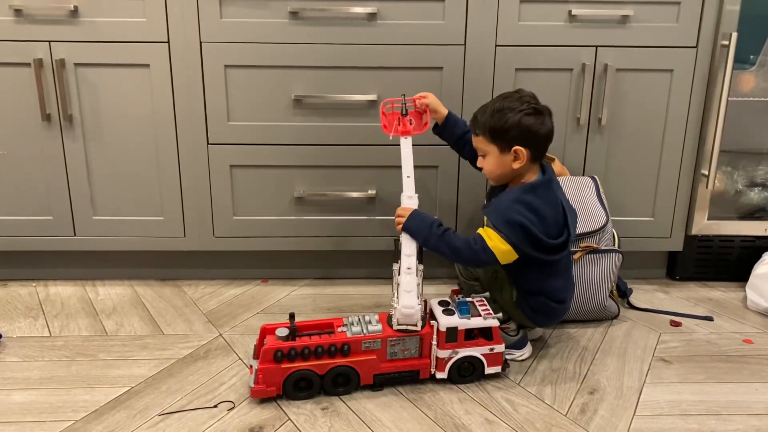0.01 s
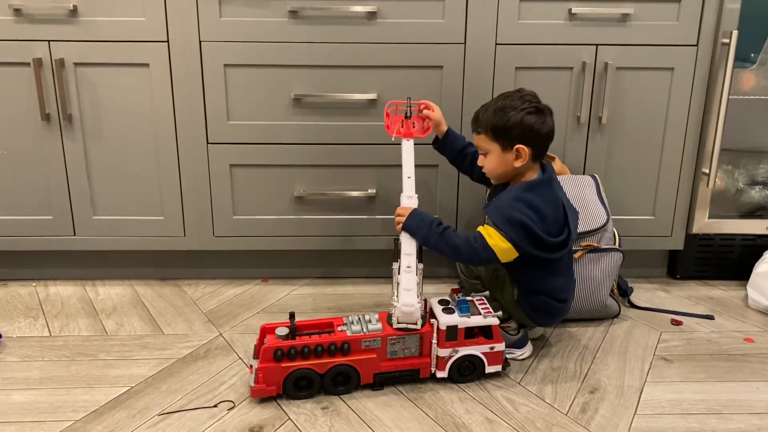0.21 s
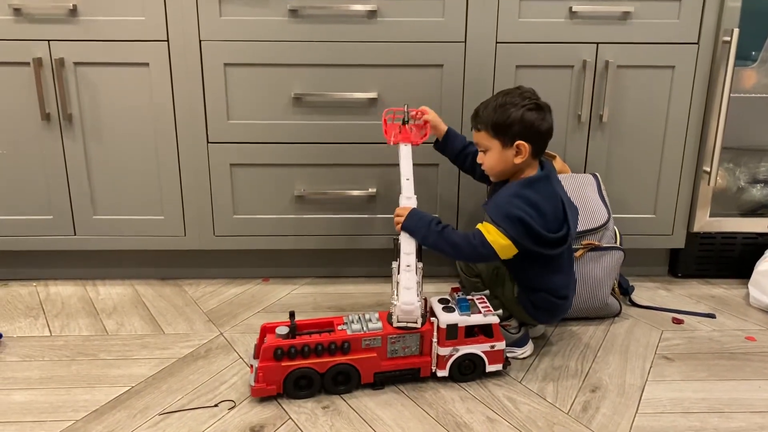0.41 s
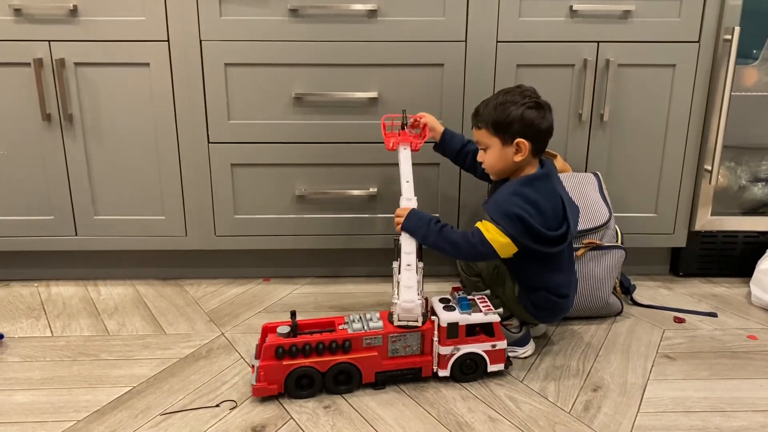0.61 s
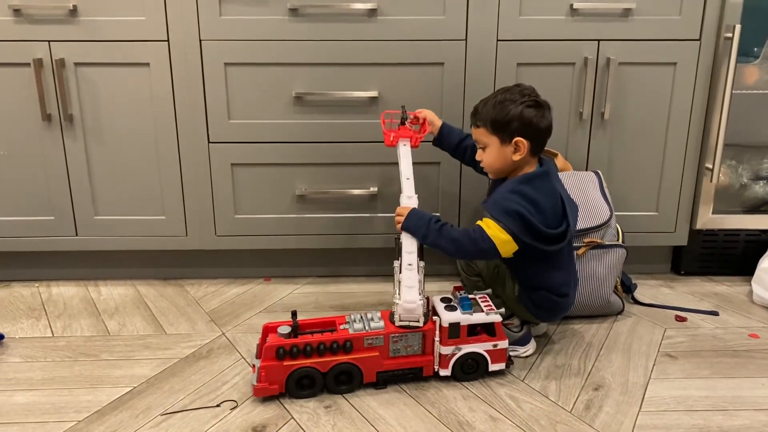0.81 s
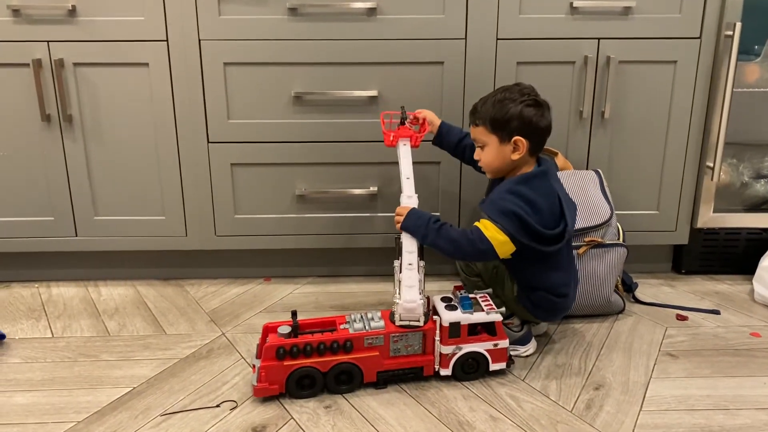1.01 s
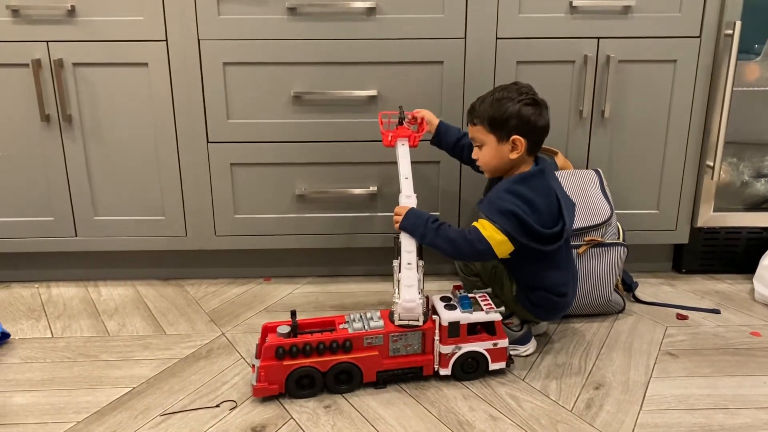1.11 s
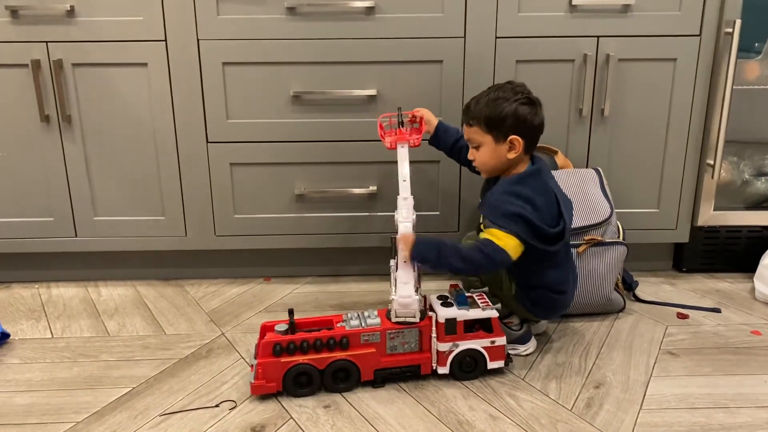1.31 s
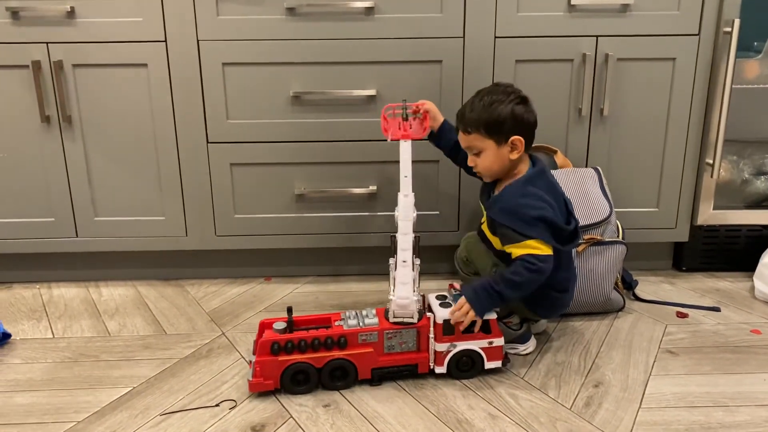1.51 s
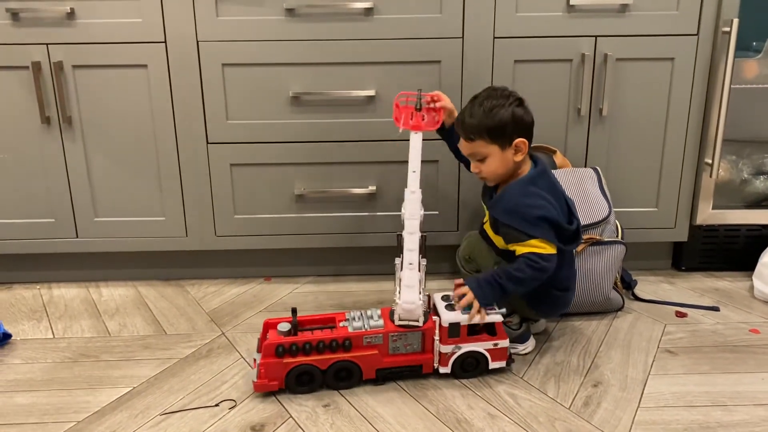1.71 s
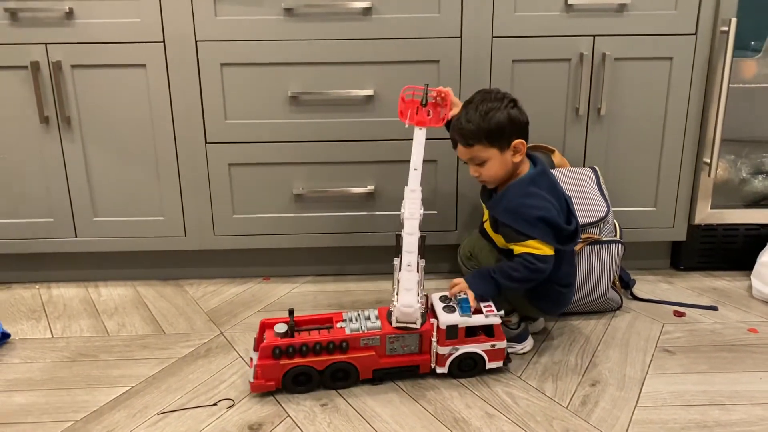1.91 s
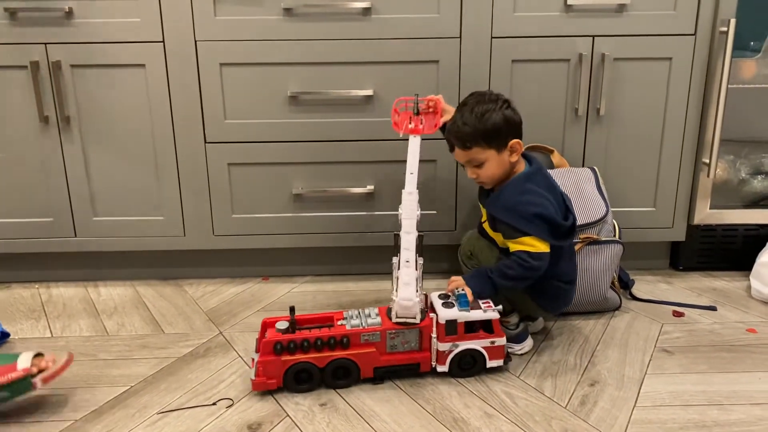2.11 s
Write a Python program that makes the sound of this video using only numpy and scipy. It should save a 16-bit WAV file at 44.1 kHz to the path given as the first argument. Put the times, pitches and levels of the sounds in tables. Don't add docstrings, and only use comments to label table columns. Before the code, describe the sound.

Hollow plastic toy ladder clicks and rattles in a dense irregular burst, strongest near the middle, with soft knocks and thuds; then sparse ticks and faint cloth rustle, heard a few steps away in a hard kitchen.

```python
import sys
import numpy as np
from scipy import signal
from scipy.fft import rfft, irfft, next_fast_len
from scipy.io import wavfile
from scipy.ndimage import uniform_filter1d

SR = 44100
rng = np.random.default_rng(int(sys.argv[2]) if len(sys.argv) > 2 else 0)


def ratio_of_db(decibels):
    return 10 ** (np.asarray(decibels, float) / 20)


def bounce(signal):
    frames = np.transpose(np.atleast_2d(signal))
    limited = np.clip(frames, -1, 1)
    pcm = np.round(limited * 32767).astype(np.int16)
    wavfile.write(sys.argv[1], SR, pcm)


N = 97020

# (time [s], rattle level [dB])
SHAKE = [(.215, -59), (.24, -38), (.33, -45), (.43, -46), (.47, -47.5), (.57, -49.5), (.61, -52),
         (.72, -59.5), (.76, -41), (.8, -98), (.83, -46), (.875, -46.5), (.915, -30.5), (1.03, -45.5),
         (1.1, -52.5), (1.22, -66), (1.27, -51), (1.4, -62)]
# (frequency [Hz], density [dB per Hz])
RATTLE_SPECTRUM = [(150, -36), (300, -2), (1000, -7), (2500, -6.5), (6500, -10.5), (9000, -14),
                   (13000, -16), (17000, -23)]
# (frequency [Hz], level [dB])
LADDER_MODES = [(1000, -37), (1250, -4), (2120, -3.5), (2500, -7), (2800, -4), (5700, -5)]
# (time [s], peak [dB], ring [Hz], treble tick [dB])
CLICKS = [(.2245, -55, 6000, -27), (.2330, -33.5, 7100, -7.5), (.2368, -20.5, 4600, -24),
          (.2398, -19, 1230, -23), (.2612, -31.5, 2500, -8), (.2946, -24.5, 4300, -19),
          (.3408, -23, 3220, -19), (.372, -23, 2660, -30), (.4498, -25.5, 5730, -17.5),
          (.4565, -39, 6770, -25), (.4642, -26.5, 6000, -19), (.471, -27, 6060, -30),
          (.4812, -28, 5660, -14), (.489, -26, 4100, -28), (.4965, -44, 5900, -35),
          (.508, -40.5, 5000, -11), (.5303, -31.5, 4530, -14), (.546, -25, 2550, -24),
          (.6266, -37.5, 6850, -12), (.632, -27.5, 5400, -19), (.6612, -31.5, 2270, -25),
          (.733, -38, 3060, -35), (.7418, -28.5, 1960, -29), (.7515, -31, 3880, -22),
          (.759, -29.5, 3070, -32), (.8142, -23.5, 2200, -22), (.818, -29, 4550, -22),
          (.88, -23, 2750, -29), (.8918, -33, 3060, -19), (.9018, -20, 2420, -15.5),
          (.9108, -19, 2190, -33), (.9158, -14, 5200, -24), (.931, -40, 2460, -29), (.94, -23, 1240, -26),
          (.9775, -29.5, 2600, -16), (1.016, -21.5, 5930, -27), (1.0205, -20, 5440, -36),
          (1.0853, -26, 2600, -26), (1.149, -35, 2200, -26), (1.2452, -30.5, 7150, -18),
          (1.2498, -28.5, 6120, -35), (1.252, -25, 3200, -27), (1.259, -31, 4870, -23),
          (1.4428, -33, 4220, -24.5), (1.797, -49, 2600, -34), (1.811, -36.5, 4400, -21),
          (1.835, -60, 3000, -23), (1.9, -39.5, 3800, -28), (1.9672, -37, 2880, -22),
          (2.1268, -39.5, 6570, -16.5)]
# (frequency [Hz], density [dB per Hz])
TICK_SPECTRUM = [(3000, -9.5), (8000, 0), (11000, 2), (13500, -1.5), (16000, -4.5)]
# (time [s], peak [dB], ring [Hz], upper modes [dB])
KNOCKS = [(0.243, -38, 388, -32), (0.29, -46, 403, -16), (0.359, -40, 398, -28), (0.399, -46, 396, -28),
          (0.419, -54.5, 332, 4), (0.491, -43.5, 390, -9), (0.551, -43, 278, -6), (0.565, -46, 306, -9),
          (0.822, -44, 422, -7.5), (0.945, -35, 419, -11), (1.001, -34, 294, -11), (1.256, -40.5, 361, -30),
          (1.272, -38, 380, -18.5), (1.306, -37.5, 417, -23), (1.321, -32, 376, -21),
          (1.335, -37.5, 339, -13), (1.356, -34, 351, -38), (1.374, -58, 353, -16),
          (1.45, -38.5, 390, -18.5), (1.478, -45, 305, -11.5), (1.512, -51.5, 368, -13),
          (2.131, -43, 385, -47)]
# (multiple of the knock [ratio], level [dB])
UPPER_MODES = [(1.56, 15.5), (2.8, 13), (3.4, -2)]
# (time [s], peak [dB], frequency [Hz])
THUDS = [
    (0.256, -47.5, 111),
    (0.558, -46, 151),
    (0.748, -64, 118),
    (0.925, -35, 170),
    (1.079, -38, 74),
    (1.109, -63, 65),
    (1.451, -49, 120),
    (2.163, -43, 68.4),
    (2.18, -50, 52),
]
# (time [s], level [dB], centre [Hz], width [Hz], decay T60 [s])
SHIVERS = [
    (.239, -38.5, 1370, 257, 0.067),
    (.45, -41.5, 5800, 604, 0.15),
    (.905, -38.5, 1140, 495, 0.2),
    (1.016, -49, 4900, 1520, 0.058),
    (1.2475, -39, 4910, 3500, 0.13),
    (1.3, -45.5, 560, 305, 0.14),
    (1.444, -45, 1030, 810, 0.063),
]
# (time [s], level [dB])
CLOTH_MOVES = [(.17, -71), (.22, -64), (.3, -74), (1.4, -62.5), (1.57, -60.5), (1.63, -57.5), (1.74, -56.5),
               (1.8, -50.5), (1.87, -59), (1.96, -53.5), (2.05, -54), (2.12, -55), (2.2, -55)]
# (frequency [Hz], density [dB per Hz])
FABRIC_SPECTRUM = [(150, -32.5), (300, -2), (1500, -12), (4500, -11), (7000, -13), (10000, -15.5),
                   (17000, -21.5)]
# (frequency [Hz], density [dB per Hz])
AIR_SPECTRUM = [(15, -70), (50, -8), (110, -7.5), (330, -13.5), (500, -22.5), (2000, -32), (8000, -38),
                (17000, -39.5)]
# (time [s], lift [dB])
RUMBLE_LIFT = [(0, -1), (.2, 1.5), (.3, 9.5), (.6, 5.5), (.75, 3.5), (.95, 12.5), (1.2, 2.5), (1.4, 6.5),
               (1.6, -2), (2.2, 1.5)]
# (frequency [Hz], decay T60 [s])
KITCHEN_T60 = [(200, 0.47), (1500, 0.56), (5000, 0.39), (14000, 0.1)]
# (frequency [Hz], likeness [0 to 1])
PORT_LIKENESS = [(60, .95), (300, .8), (700, .3), (1200, .35), (1900, .1), (2500, .55), (5200, .25)]
# (frequency [Hz], left leads by [rad])
PORT_LEAD = [(60, .05), (400, .45), (1100, 1.5), (1700, 3.2), (2100, 6.1), (2900, 7.0), (4000, 6.2),
             (7016, 6.28)]
# (frequency [Hz], left over right [dB])
PORT_LEAN = [(100, .5), (300, 2.4), (600, 2.8), (1300, -.5), (3000, 1.2), (6000, -.3), (9000, 0)]


def evened(x):
    return x / np.sqrt(np.mean(x ** 2) + 1e-20)


def read(points, hz):
    f, value = np.transpose(points)
    return np.interp(np.log(hz + 1), np.log(f + 1), value)


def curve(points):
    return np.interp(np.arange(N) / SR, *np.transpose(points), left=-120, right=-120)


def add(mix, s, sound):
    part = mix[round(s * SR):][:len(sound)]
    part += sound[:len(part)]


def ring(hz, t60, rise_s=.0004):
    t = np.arange(int(abs(t60) * SR) + 20) / SR
    return (1 - np.exp(-t / rise_s)) * ratio_of_db(-60 * t / t60) * np.sin(2 * np.pi * hz * t)


def colour(x, spectrum):
    log_gain = np.log(ratio_of_db(read(spectrum, np.abs(np.fft.fftfreq(4096, 1 / SR)))))
    taps = np.fft.ifft(np.exp(np.conj(signal.hilbert(log_gain)))).real[:2048]
    return signal.oaconvolve(x, taps)[:N]


def grains(per_s, spread_db):
    hit, size, sign = rng.random((N, 3)).T
    level_db = spread_db * np.minimum(-np.log(size + 1e-9), 5)
    return (hit < per_s / SR) * ratio_of_db(level_db) * np.sign(sign - .5)


def ladder(impacts):
    t60_at_1khz = 0.037
    weights = rng.uniform(-1.5, 1.5, (len(LADDER_MODES), N // 64 + 1)).repeat(64, axis=1)[:, :N]
    out = np.zeros(N)
    for (hz, db), weight in zip(LADDER_MODES, weights):
        mode = ring(hz, t60_at_1khz * (1000 / hz) ** 0.36)
        out += ratio_of_db(db) * signal.oaconvolve(impacts * weight, mode)[:N]
    return out


def rattle():
    impacts = grains(per_s=3000, spread_db=2.2)
    chatter = evened(colour(impacts, RATTLE_SPECTRUM))
    ringing = ratio_of_db(-15.5) * evened(ladder(impacts))
    return ratio_of_db(curve(SHAKE)) * (chatter + ringing)


def clicks():
    ring_t60, tick_t60, lag_s = .007, .008, 0.00074
    rings, blows, cracks, ticks = np.zeros((4, N))
    fade = ratio_of_db(-60 * np.arange(900) / SR / tick_t60)
    for (s, db, hz, tick_db), noise in zip(CLICKS, rng.standard_normal((len(CLICKS), 900))):
        body = ring(hz, ring_t60)
        roughness = 1 + 0.26 * noise[:len(body)].clip(-1.5, 1.5)
        add(rings, s, ratio_of_db(db + 1) * body * roughness)
        add(ticks, s, ratio_of_db(db + tick_db + 17) * noise * fade)
        add(cracks, s, ratio_of_db(db + 11.5) * noise[::-1] * fade ** 0.63)
        add(blows, s, ratio_of_db(np.array([db - 16])))
    thin_cracks = uniform_filter1d(np.diff(cracks, prepend=0), size=4)
    snaps = rings + colour(ticks, TICK_SPECTRUM) + ladder(blows) + colour(thin_cracks, RATTLE_SPECTRUM)
    return np.roll(snaps, round(lag_s * SR))


def knocks():
    t60, rise_s = 0.079, 0.0015
    out = np.zeros(N)
    detunes = rng.uniform(.88, 1.12, (len(KNOCKS), len(UPPER_MODES)))
    for (s, db, hz, upper_db), detune in zip(KNOCKS, detunes):
        add(out, s, ratio_of_db(db + 1.5) * ring(hz, t60, rise_s))
        for (multiple, mode_db), shift in zip(UPPER_MODES, detune):
            mode = ring(hz * multiple * shift, t60 * 0.39, rise_s * 0.47)
            add(out, s, ratio_of_db(db + 1.5 + upper_db + mode_db) * mode)
    for s, db, hz in THUDS:
        add(out, s, ratio_of_db(db + 13) * ring(hz, t60=0.027, rise_s=0.0035))
    return out


def shivers():
    out, t = np.zeros(N), np.arange(SR // 4) / SR
    draws = rng.standard_normal((len(SHIVERS), 2, len(t)))
    for (s, db, hz, width_hz, t60), (hit, size) in zip(SHIVERS, draws):
        edges_hz = [hz - width_hz / 2, hz + width_hz / 2]
        band = signal.butter(2, edges_hz, "bandpass", fs=SR, output="sos")
        buzz = evened(signal.sosfilt(band, (hit > 1) * size))
        add(out, s, ratio_of_db(db - 60 * t / t60) * np.minimum(t / .003, 1) * buzz)
    return out


def cloth():
    friction = colour(grains(per_s=6000, spread_db=2.8), FABRIC_SPECTRUM)
    return ratio_of_db(curve(CLOTH_MOVES)) * evened(friction)


def hush():
    noise = rng.standard_normal((2, N))
    air = ratio_of_db(-57) * evened(np.array([colour(v, AIR_SPECTRUM) for v in noise]))
    bass = signal.sosfilt(signal.butter(2, 220, fs=SR, output="sos"), air)
    return air + (ratio_of_db(curve(RUMBLE_LIFT)) - 1) * bass


def kitchen(x, room_db):
    turn_hz, early_db, size = 14.035, 0, SR // 2
    out = np.zeros((2, N))
    turn = np.pi * turn_hz * np.arange(N) / SR / 3
    for k in range(3):
        taps, early = np.zeros((2, size)), np.zeros((2, size))
        at = np.arange(400, size - 20, 20) + rng.integers(0, 20, (2, (size - 401) // 20))
        np.put_along_axis(taps, at, rng.choice([-1., 1.], at.shape), 1)
        hz, t, z = signal.stft(taps, SR, nperseg=256)
        decay = ratio_of_db(-60 * t / read(KITCHEN_T60, hz)[:, None])
        tail = signal.istft(z * decay, SR, nperseg=256)[1][:, :size]
        echoes = ratio_of_db(early_db) * rng.choice([-.4, .4], (2, 7))
        np.put_along_axis(early, rng.integers(30, 900, (2, 7)), echoes, 1)
        share = np.sqrt(2 / 3) * np.cos(turn + k * np.pi / 3)
        room = tail / np.linalg.norm(tail[0]) + early
        out += ratio_of_db(room_db) * signal.fftconvolve(share * x[None], room, axes=1)[:, :N]
    return out + np.array([x, np.roll(x, 130)])


def scene():
    near = kitchen(rattle() + cloth() + shivers(), room_db=-3)
    near += kitchen(clicks(), room_db=-11)
    near += kitchen(knocks(), room_db=-6)
    mic_low = signal.butter(2, 42, "highpass", fs=SR, output="sos")
    return signal.sosfilt(mic_low, near * ratio_of_db(1.5)) + hush()


def two_ports(dry):
    join_hz, join_width_hz, treble_same = 6580, 360, .92
    gap_s, edge_hz, top_db_per_khz = 11 / SR, 16900, 20
    size = next_fast_len(N + 512)
    hz, (left, other) = np.fft.rfftfreq(size, 1 / SR), rfft(dry, size)
    join = 1 / (1 + np.exp(-(hz - join_hz) / join_width_hz))
    same = np.clip(read(PORT_LIKENESS, hz) * (1 - join) + join * treble_same, 0, 1)
    lead = np.where(hz > 7016, -2 * np.pi * (hz * gap_s + .25), read(PORT_LEAD, hz))
    right = same * left * np.exp(-1j * lead) + np.sqrt(1 - same ** 2) * other
    power = uniform_filter1d(abs(np.array([left, right])) ** 2, 500) + 1e-12
    right = right * np.sqrt(power[0] / power[1]) * ratio_of_db(-read(PORT_LEAN, hz))
    roll_off = (hz < edge_hz) * ratio_of_db(-top_db_per_khz * np.clip(hz / 1000 - 15.8, 0, 9))
    return irfft(np.array([left, right]) * roll_off, size)[:, :N]


def thin_steady_treble(ports):
    weak_db, sudden_db, steady_edge_hz, lead_in = 5, 9, 15850, 1024 - 276
    pair = np.pad([ports[0] + ports[1], ports[0] - ports[1]], ((0, 0), (lead_in, 0))) / 2
    window = np.sin(np.pi * (np.arange(2048) + .5) / 2048)
    hz, t, z = signal.stft(pair, SR, window, 2048, 1024)
    hz = hz[:1024, None]
    band_power = (abs(z[:, :1024]) ** 2).reshape(2, 32, 32, -1).sum(axis=2)
    band_db = 10 * np.log10(band_power + 1e-20)
    edge = uniform_filter1d(np.diff(pair, 2, axis=1) ** 2, 128).sum(axis=0) + 1e-14
    jump = edge / np.roll(uniform_filter1d(edge, 700), 420) > ratio_of_db(2 * sudden_db)
    sudden = uniform_filter1d(jump * 1., 600)[lead_in - 200:][:N] > 1e-6
    strong = (band_db > band_db[::-1] - weak_db).repeat(32, axis=1)
    z[:, :1024] *= (strong | (hz < 6200)) & (hz < steady_edge_hz)
    mid, side = signal.istft(z, SR, window, 2048, 1024)[1][:, lead_in:][:, :N]
    steady = np.array([mid + side, mid - side])
    return steady + (ports - steady) * uniform_filter1d(sudden * 1., 128)


def band_limit(x):
    return signal.sosfilt(signal.butter(12, 17000, fs=SR, output="sos"), x)


def record(dry):
    ceiling = .3
    ports = ceiling * np.tanh(two_ports(dry) / ceiling)
    mix = thin_steady_treble(ports)
    return band_limit(mix)


dry = scene()
out = record(dry)
bounce(out)
```